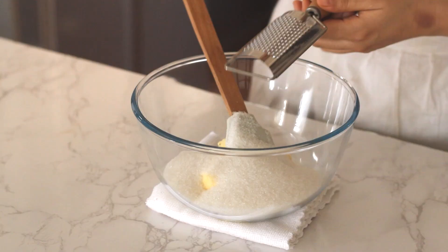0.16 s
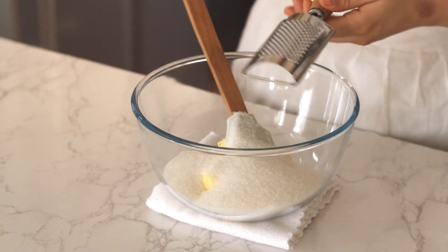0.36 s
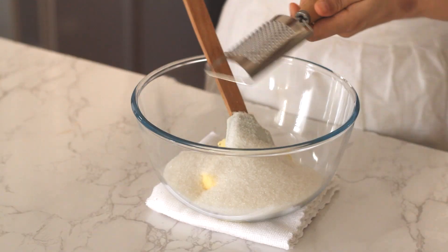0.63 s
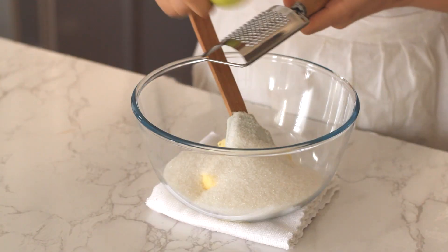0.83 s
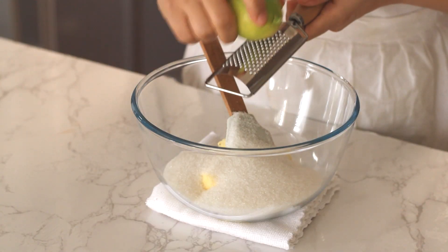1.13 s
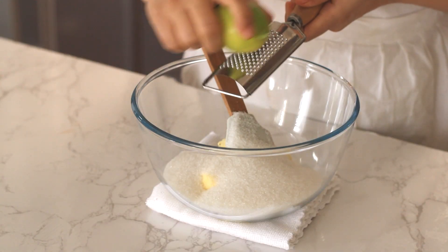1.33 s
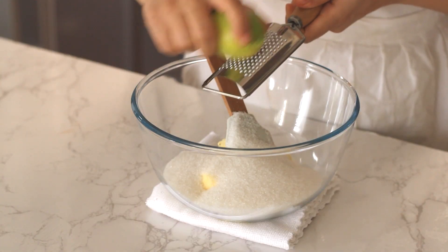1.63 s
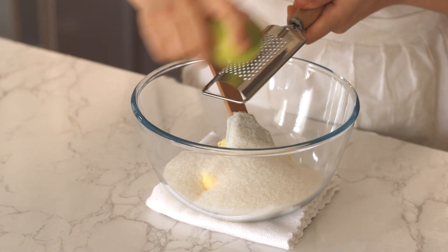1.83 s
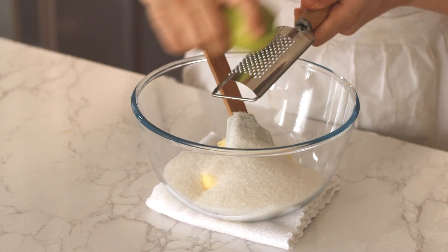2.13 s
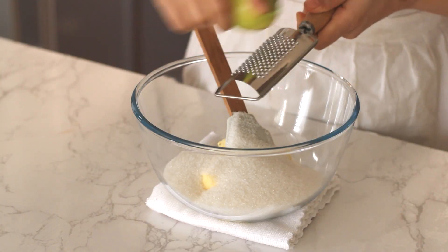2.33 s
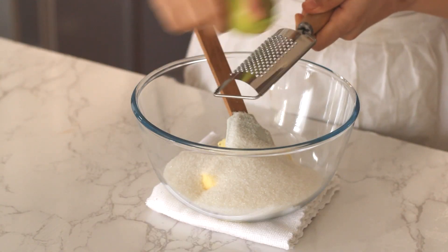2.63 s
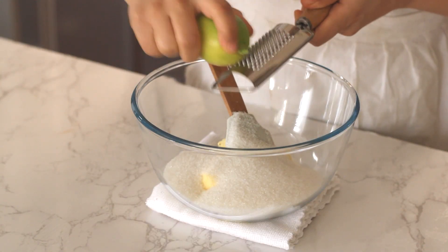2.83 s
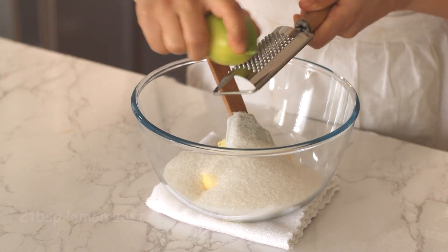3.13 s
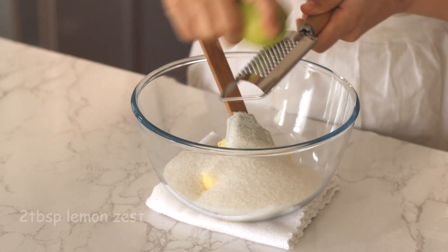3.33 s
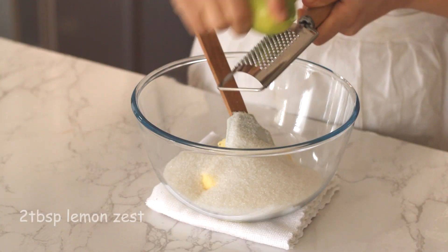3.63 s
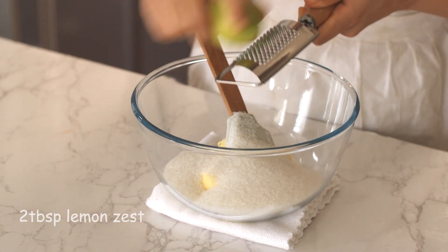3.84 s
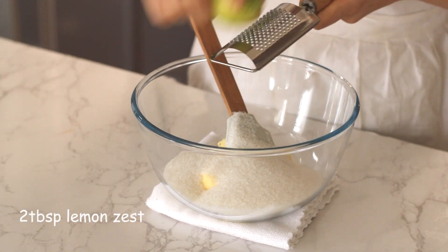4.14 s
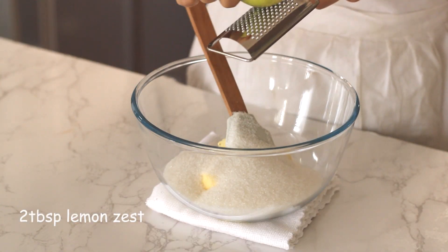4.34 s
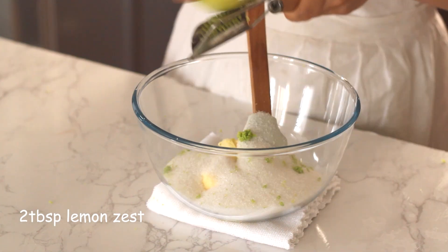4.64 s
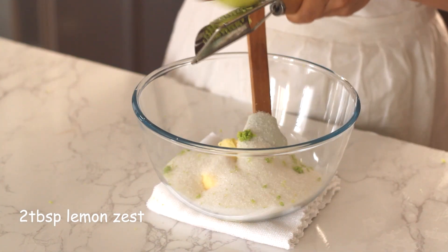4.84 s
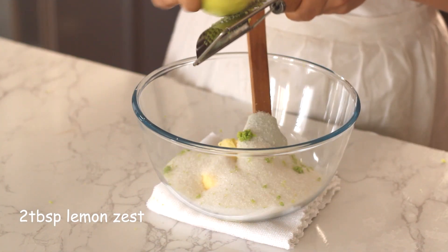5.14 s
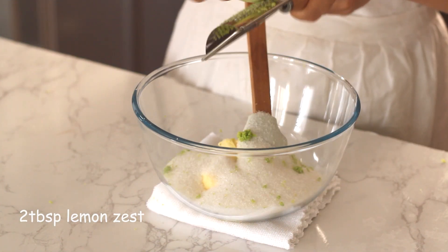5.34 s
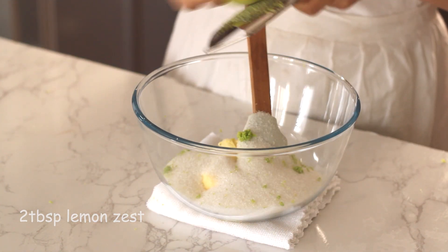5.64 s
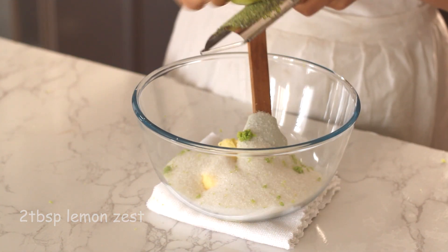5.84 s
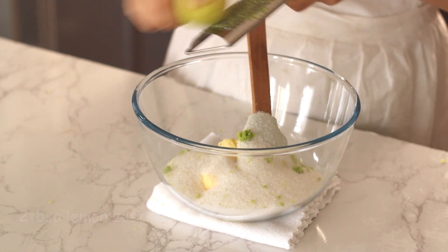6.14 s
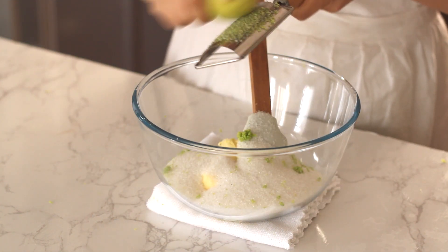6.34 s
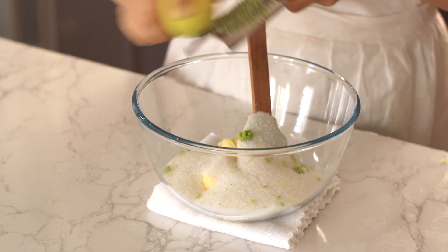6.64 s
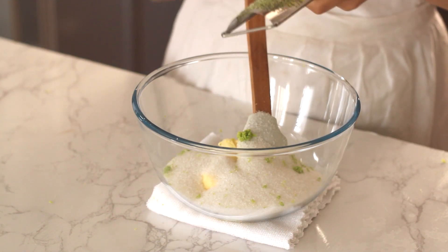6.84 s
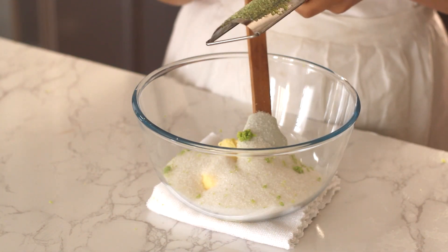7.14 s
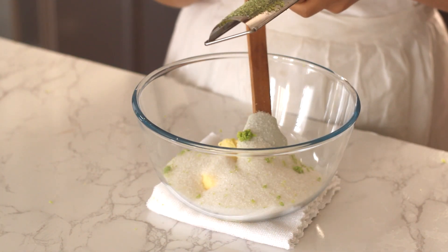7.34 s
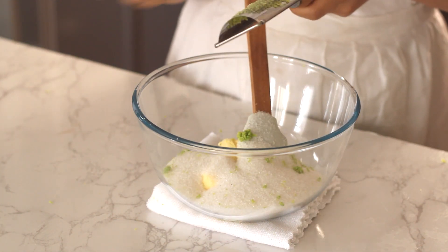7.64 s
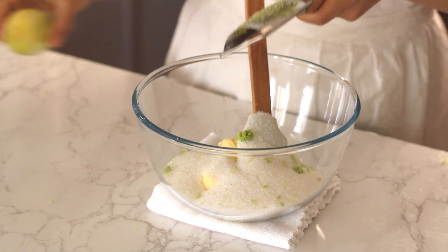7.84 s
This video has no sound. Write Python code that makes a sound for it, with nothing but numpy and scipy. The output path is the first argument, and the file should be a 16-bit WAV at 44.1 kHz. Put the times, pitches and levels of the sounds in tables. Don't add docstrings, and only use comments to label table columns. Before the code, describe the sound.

In a quiet kitchen, citrus rind rasps over a fine metal grater, first slow separate strokes with taps, then quick back-and-forth scraping.

```python
import sys
import numpy as np
from scipy import signal
from scipy.fft import rfft, irfft, next_fast_len
from scipy.io import wavfile
from scipy.ndimage import uniform_filter1d

SR = 44100
rng = np.random.default_rng(int(sys.argv[2]) if len(sys.argv) > 2 else 0)


def attenuation_scalar(level_db):
    decades = np.asarray(level_db, float) / 20
    return 10 ** decades


def master(y):
    cut = np.clip(np.atleast_2d(y).T, -1, 1)
    pcm = np.round(cut * 32767)
    wavfile.write(sys.argv[1], SR, pcm.astype(np.int16))


N = 351918
TIME = np.arange(N) / SR
CHANGE_S = 4.657
AFTER_CHANGE = TIME >= CHANGE_S

# (start [s], length [s], rasp [dB], thud relative to rasp [dB], lean [0-1])
SLOW_STROKES = [(1.245, 0.098, -24.5, -26, 0.63), (1.411, 0.11, -34.5, -20, 0.37),
                (1.58, 0.1, -29, -16, .47), (1.73, 0.12, -33, -24, 0.18), (1.879, 0.12, -25.5, -13, 0.52),
                (2.219, 0.12, -22.5, -15, 0.46), (2.537, 0.11, -22.5, -11, 0.33),
                (2.842, 0.11, -22.5, -14, 0.38), (3.147, 0.11, -19.5, -9, 0.31),
                (3.432, .127, -23, -8.5, 0.3), (3.75, .04, -33, -17.5, .4), (3.777, 0.11, -19.5, -11.5, .3),
                (4.068, 0.12, -19.5, -15.5, 0.55), (4.386, 0.038, -35, -16, 0.21),
                (4.475, .096, -18.5, -16, 0.57)]
# (start [s], length [s], rasp [dB], thud relative to rasp [dB], lean [0-1])
QUICK_STROKES = [(4.661, 0.079, -34, -19, .1), (4.689, 0.091, -16.5, -14.5, 0.71),
                 (4.813, 0.071, -17.5, -13, .21), (4.923, .086, -20.5, -12, 0.72),
                 (5.044, 0.085, -19.5, -17.5, 0.32), (5.17, 0.085, -22.5, -14, 0.74),
                 (5.334, 0.065, -21, -13.5, 0.76), (5.418, 0.083, -36, -16, 0.23),
                 (5.476, 0.1, -18, -19.5, 0.61), (5.597, 0.094, -21, -14, 0.5),
                 (5.715, 0.093, -19, -10.5, 0.53), (5.833, 0.094, -22.5, -9, 0.35),
                 (5.951, 0.089, -21, -11, 0.66), (6.064, 0.087, -20.5, -13, 0.57),
                 (6.179, 0.094, -20.5, -14.5, 0.71), (6.299, 0.091, -19.5, -14.5, 0.41),
                 (6.418, 0.096, -21.5, -12.5, 0.54), (6.551, 0.097, -22, -18.5, 0.45),
                 (6.665, 0.11, -22, -13.5, 0.59)]
# (time [s], peak [dB], thud relative to peak [dB])
TAPS = [(2.1735, -22, -19.5), (2.5006, -18.5, -19.5), (2.5066, -31.5, -14), (2.798, -21.5, -20.5),
        (3.0995, -20.5, -23.5), (3.3898, -24.5, -24), (3.7045, -20.5, -21.5), (3.7135, -30.5, -21),
        (4.017, -27.5, -16), (4.328, -20.5, -20), (4.4662, -36, -9)]


def rms_one(x):
    return x / np.sqrt(np.mean(x ** 2) + 1e-20)


def at_hz(points, hz):
    table_hz, values = np.transpose(points)
    return np.interp(np.log(hz + 1), np.log(table_hz), values)


def drift(rate):
    r = np.exp(-80 * np.pi * rate / SR)
    slow = signal.lfilter([1], [1, -2 * r, r * r], rng.standard_normal(N // 40 + 1002))[1000:]
    return np.interp(np.arange(N) / 40, np.arange(len(slow)), rms_one(slow))


def resonate(x, hz, width_hz):
    r = np.exp(-np.pi * width_hz / SR)
    gain = (1 - r * r) / 2
    return signal.lfilter([gain, 0, -gain], [1, -2 * r * np.cos(2 * np.pi * hz / SR), r * r], x + 1e-18)


def grater():
    rasp, thud = strokes()
    tap_crack, tap_thud = landings()
    struck = tap_crack + snaps()
    thud = thud + tap_thud
    return first_grip(rasp, thud, struck), second_grip(rasp, thud, struck)


def strokes():
    hold_share = (.53, 0.68)
    rasp, thud = np.zeros((2, N))
    for start, length, rasp_db, thud_db, lean in SLOW_STROKES + QUICK_STROKES:
        hold = length * hold_share[int(start > CHANGE_S)]
        rise = (length - hold) * lean
        fall = (length - hold) * (1 - lean)
        knots = start + np.cumsum([-rise, rise, rise, hold / 2, hold / 2, fall, fall])
        knots_db = [-73.5, -14, -2.5, -0.1, -2.5, -16.0, -45.5]
        shape_db = np.interp(TIME, knots, knots_db, left=-200, right=-200)
        rasp += attenuation_scalar(rasp_db + shape_db)
        thud += attenuation_scalar(rasp_db + thud_db + 1.15 * shape_db)
    for s, peak_db, _ in TAPS:
        rasp += attenuation_scalar(peak_db - 15.5 - 1200 * np.clip(TIME - s, 0, 1)) * (TIME > s)
    flutter = attenuation_scalar(0.9 * drift(57.2))
    return rasp * flutter * tearing(9000, spread_db=1.0), thud * flutter * tearing(1500, spread_db=1.5)


def tearing(per_s, spread_db):
    force = attenuation_scalar(spread_db * np.minimum(rng.exponential(1, N), 5))
    caught = rng.random(N) < per_s / SR
    return rms_one(force * rng.choice([-1, 1], N) * caught)


def landings():
    crack, thud = np.zeros((2, N))
    contact = np.exp(-np.arange(400) / (0.0012 * SR))
    for s, peak_db, thud_db in TAPS:
        at = round(s * SR) - 8
        crack[at:at + 400] += attenuation_scalar(peak_db - 2.5) * contact * rng.standard_normal(400)
        thud[at:at + 400] += attenuation_scalar(peak_db + thud_db + 1.5) * contact
    return crack, thud


def snaps():
    # (time [s], peak [dB], length [ms])
    snap_events = [(4.7083, -3, 2.3), (4.71, -12, 1), (4.838, -15.5, 0.66), (5.185, -18, 1.3),
                   (5.3818, -6.5, 0.57), (5.4404, -6, 0.3), (5.443, -14, 1.7), (5.4528, -13, .4),
                   (5.470, -22, 1.0), (5.483, -16, 1.6), (5.49, -7, 0.79)]
    out = np.zeros(N)
    for s, peak_db, length_ms in snap_events:
        at = round(s * SR)
        fade = np.exp(-np.arange(400) / (length_ms * SR / 1000))
        crack = np.diff(rng.choice([-1, 1], 400), prepend=0) / 1.4
        out[at:at + 400] += attenuation_scalar(peak_db) * fade * crack
    return out


def first_grip(rasp, thud, struck):
    # (frequency [Hz], width [Hz], level [dB])
    sheet_modes = [(1164, 43, -10), (1496, 58, -9.5), (1990, 400, -8.5), (2494, 190, -13),
                   (3014, 750, -9.5), (4760, 520, -2.5), (5600, 410, 0.5), (6400, 850, -2.5),
                   (7890, 1200, -4.5), (10150, 1400, -7), (11400, 600, -2), (13600, 1800, -8.5),
                   (14600, 1700, -26), (16770, 1300, -6)]
    # (frequency [Hz], width [Hz], level [dB])
    frame_modes = [(289, 140, -10.5), (421.6, 270, -4.5), (570, 278, 0), (668, 101, 1.5), (774, 62, -8)]
    # (frequency [Hz], width [Hz], level [dB])
    tapped_modes = [(1630, 40, 1), (2450, 360, 2), (2850, 340, 1.5), (4200, 270, 1.5), (4700, 300, 1),
                    (6600, 700, -2.5), (8120, 574, -3), (10050, 260, 3), (10240, 660, -1), (11850, 400, 2),
                    (12900, 500, -15), (14950, 787, -18.5)]
    # (frequency [Hz], width [Hz], depth [0-1])
    dead_spots = [(1330, 290, .7), (2830, 210, 0.4)]
    # (from [s], to [s])
    shift_s = (3.3, 3.8)
    sheet = body(rasp, sheet_modes, 0.86)
    deadness = np.interp(TIME, shift_s, [1, 0.32])
    for hz, width_hz, depth in dead_spots:
        sheet = sheet - depth * deadness * resonate(sheet, hz, width_hz)
    sheet = sheet - 0.95 * returning() * resonate(sheet, 2720, 450)
    return sheet + body(thud, frame_modes, 0.88) + body(struck, tapped_modes)


def second_grip(rasp, thud, struck):
    # (frequency [Hz], width [Hz], level [dB])
    sheet_modes = [(1135, 153, -6), (1500, 900, -5.5), (1766, 466, -0.5), (2450, 660, -9), (3074, 350, -1),
                   (3490, 287, -1), (4420, 870, -1.5), (5550, 700, -2.5), (6400, 630, 0.5), (7290, 510, -1),
                   (9950, 2700, -4.5), (7720, 2700, -14.5), (11440, 3500, -7), (12650, 440, -13.5),
                   (13960, 1100, -14.5), (15130, 5900, -7)]
    # (frequency [Hz], width [Hz], level [dB])
    frame_modes = [(179, 45, -11), (317, 340, -11.5), (522, 49, 4), (671, 56, 6), (930, 760, -8.5)]
    sheet = body((rasp + struck) * AFTER_CHANGE, sheet_modes, 0.93)
    return sheet + body(thud * AFTER_CHANGE, frame_modes, 1)


def body(x, modes, wander=0.):
    low_db, mid_db, upper_db = zone_colours()
    click = np.eye(1, 4096)[0]
    click_ring, out = 0, 0
    for k, (hz, width_hz, db) in enumerate(modes):
        zone_db = low_db * (hz < 540) + mid_db * (950 < hz < 2200) + upper_db * (2200 < hz < 3800)
        place_db = zone_db + 2.2 * drift(8)
        gain = (-1) ** k * attenuation_scalar(db)
        click_ring = click_ring + gain * resonate(click, hz, width_hz)
        out = out + gain * resonate(x * attenuation_scalar(place_db * wander), hz, width_hz)
    return out / np.sqrt(np.sum(click_ring ** 2))


def zone_colours():
    # (time [s], reach [dB])
    reach_points = [(1.3, -11), (1.5, -2), (2.3, -3.5), (3.3, -2), (3.55, -0.5), (3.8, 4.5), (4.2, 0.5),
                    (4.5, -5), (4.7, 6.5), (4.9, 8.5), (5.3, 2.5), (5.6, -2), (6.7, 1)]
    # (low [dB/dB], middle [dB/dB], upper [dB/dB])
    weight_colours = [(-0.2, 0.42, .55), (-0.6, 0.28, 0.11)]
    # (low [dB/dB], middle [dB/dB], upper [dB/dB])
    reach_colours = (.2, 0.85, .1)
    s, length, _, weight_db, _ = np.transpose(SLOW_STROKES + QUICK_STROKES)
    extra_db = np.interp(TIME, s + length / 2, weight_db) + 14
    reach_db = np.interp(TIME, *np.transpose(reach_points))
    zones = []
    for slow, quick, per_reach in zip(*weight_colours, reach_colours):
        zones.append(np.where(AFTER_CHANGE, quick, slow) * extra_db + per_reach * reach_db)
    low, mid, upper = zones
    return low, mid + 6 * returning(), upper


def returning():
    # (from [s], to [s])
    return_times = [
        (1.4, 1.53),
        (1.72, 1.85),
    ]
    active = sum(1. * (TIME > a) * (TIME < b) for a, b in return_times)
    return uniform_filter1d(active, size=600)


def handling():
    # (start [s], length [s], ring [Hz], width [Hz], level [dB])
    touches = [(.222, 0.0036, 4650, 8000, -60), (0.213, 0.093, 2420, 1970, -59),
               (.26, 0.16, 1990, 2450, -60), (0.335, 0.13, 11500, 4000, -65),
               (0.342, 0.079, 7900, 400, -67), (0.575, 0.0061, 5830, 1500, -49),
               (0.578, .008, 13000, 6000, -61), (.62, 0.23, 11600, 500, -66),
               (.62, 0.24, 5830, 8000, -62.5), (.755, 0.067, 3290, 250, -53.5),
               (1.065, 0.0062, 11000, 9000, -57.5), (7.65, 0.12, 3480, 2990, -66),
               (7.7, 0.35, 5000, 7000, -70), (7.903, .045, 4500, 500, -72),
               (7.913, 0.0057, 4340, 700, -47.5), (7.942, 0.0044, 8600, 8000, -66)]
    out = np.zeros(N)
    for start, length, hz, width_hz, db in touches:
        swell = np.sin(np.pi * np.clip((TIME - start) / length, 0, 1) ** 0.74)
        ring = resonate(resonate(rng.standard_normal(N), hz, width_hz), hz, 2 * width_hz)
        out += attenuation_scalar(db) * swell * rms_one(ring)
    return out


def kitchen(x):
    # (frequency [Hz], time [s])
    echo_times = [(300, 0.28), (1500, 0.23), (5000, 0.32), (9000, 0.24), (16000, 0.022)]
    t = TIME[:SR // 2]
    edges_hz = 200 * 2 ** np.arange(0, 6.6, .5)
    tails = 0
    for low, high in zip(edges_hz, edges_hz[1:]):
        band_pass = signal.butter(2, [low, high], "band", fs=SR, output="sos")
        band = signal.sosfilt(band_pass, rng.standard_normal((2, len(t))))
        decay = attenuation_scalar(-60 * t / at_hz(echo_times, np.sqrt(low * high)))
        tails = tails + band * decay * np.clip(t / 0.00067, 0, 1)
    tails = tails / np.sqrt(np.sum(tails[0] ** 2))
    return signal.fftconvolve(x[None], tails)[:, :N]


def room_air():
    # (frequency [Hz], level [dB per Hz])
    air_first = [(20, -9), (60, -2.5), (130, -2.5), (200, -2.5), (400, -8), (600, -12.5), (730, -7),
                 (870, -14), (1070, -11.5), (1300, -17), (3000, -25.5), (6000, -33), (16000, -36)]
    # (frequency [Hz], level [dB per Hz])
    air_second = [(20, -4), (60, -2.5), (130, -2.5), (200, -8.5), (400, -9.5), (600, -17), (730, -13.5),
                  (1070, -18.5), (1500, -22.5), (3000, -31.5), (6000, -37), (16000, -39)]
    # (before [dB rms], after [dB rms])
    first_db, second_db = (-51.5, -52.5)
    return np.where(AFTER_CHANGE, attenuation_scalar(second_db) * air(air_second), attenuation_scalar(first_db) * air(air_first))


def air(spectrum):
    size = next_fast_len(N)
    hz = np.arange(size // 2 + 1) * SR / size
    white = rfft(rng.standard_normal(size))
    return rms_one(irfft(white * attenuation_scalar(at_hz(spectrum, hz)), size)[:N])


def appliance():
    # (frequency [Hz], width [Hz], level [dB rms])
    hum_first = [(26.8, 1.5, -56), (86.5, 5, -55), (98, 1.6, -53), (118, 6, -61), (194.6, 4, -64),
                 (740, 40, -72), (1074, 50, -74)]
    # (frequency [Hz], width [Hz], level [dB rms])
    hum_second = [(86.8, 1.8, -49.5), (100, 3, -56), (194.5, 3.3, -65.5)]
    before = sum(attenuation_scalar(db) * hum_tone(hz, width_hz) for hz, width_hz, db in hum_first)
    after = sum(attenuation_scalar(db) * hum_tone(hz, width_hz) for hz, width_hz, db in hum_second)
    return np.where(AFTER_CHANGE, after, before)


def hum_tone(hz, width_hz):
    phase = 2 * np.pi * np.cumsum(hz + width_hz / 2 * drift(10)) / SR
    return rms_one(attenuation_scalar(1.5 * drift(4)) * np.sin(phase))


def offset():
    # (time [s], offset after [1], overshoot [1], time to peak [s])
    kicks = [
        (.215, .0216, .0145, .056),
        (4.655, .0255, .032, .085),
    ]
    out = np.full(N, 0.0184)
    for s, after, overshoot, peak_s in kicks:
        x = np.clip((TIME - s) / peak_s, 0, None)
        hump = (x * np.exp(1 - x)) ** 1.35
        out = out + (after - out) * np.clip(x, 0, 1) + overshoot * hump
    return out


def late_right(x):
    lags = (1.36, 2.52)
    size = next_fast_len(N)
    turns = np.arange(size // 2 + 1) / size
    before, after = (irfft(rfft(x, size) * np.exp(-2j * np.pi * turns * lag), size)[:N] for lag in lags)
    return np.where(AFTER_CHANGE, after, before)


def scrambled(x):
    cells = signal.stft(x, nperseg=256)[2]
    random_turns = np.exp(2j * np.pi * rng.random(cells.shape))
    other = signal.istft(cells * random_turns, nperseg=256)[1][:N]
    power = uniform_filter1d(x ** 2, size=60)
    other_power = uniform_filter1d(other ** 2, size=60)
    return other * np.sqrt(power / (other_power + 1e-14) + 1e-9)


def scene():
    first, second = grater()
    hands = handling()
    first = (first + hands) * ~AFTER_CHANGE
    second = second + hands * AFTER_CHANGE
    wet = attenuation_scalar(-10.5) * (kitchen(first) * ~AFTER_CHANGE + kitchen(second))
    shared = first + second + wet[0] + room_air() + appliance()
    own = attenuation_scalar(-16.0) * wet[1] + attenuation_scalar(-19) * room_air()
    return np.array([shared + own, shared - own])


def band_limit(x):
    return signal.sosfilt(signal.butter(12, 16690, fs=SR, output="sos"), x)


def record(dry):
    right = late_right(dry[1])
    mid, side = (dry[0] + right) / 2, (dry[0] - right) / 2
    kept = 0.75
    side = kept * side + np.sqrt(1 - kept ** 2) * scrambled(side)
    mid = mid + attenuation_scalar(np.where(AFTER_CHANGE, -26, -11)) * scrambled(side)
    hiss = attenuation_scalar(-76) * rng.standard_normal((2, N))
    low_pass = signal.ellip(12, .5, 60, 15950, fs=SR, output="sos")
    pair = signal.sosfilt(low_pass, [mid + side, .975 * (mid - side)] + hiss)
    mix = np.clip(pair + offset(), -1, 1)
    return band_limit(mix)


dry = scene()
out = record(dry)
master(out)
```